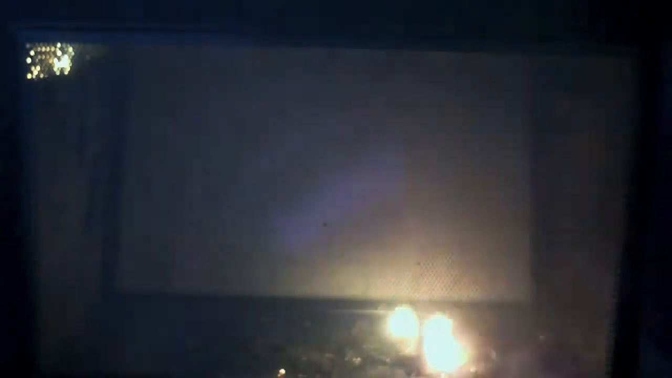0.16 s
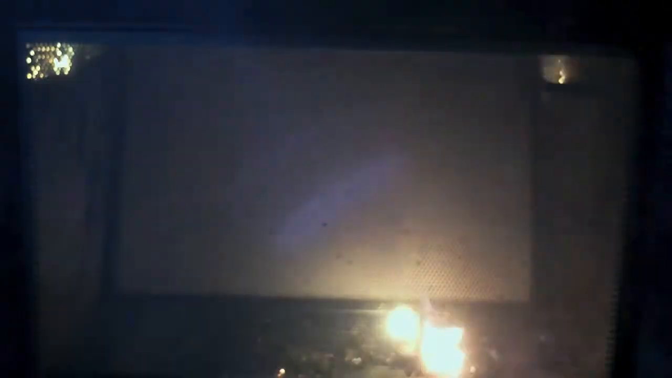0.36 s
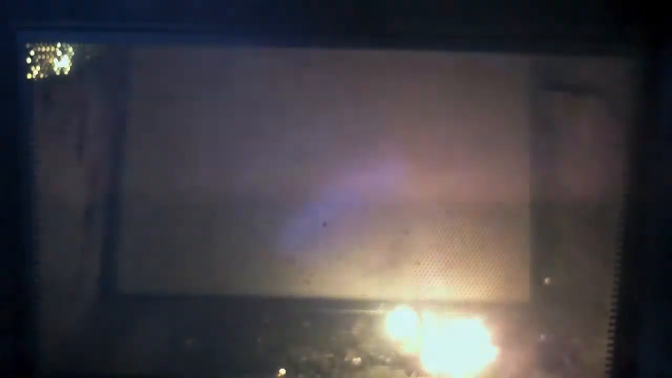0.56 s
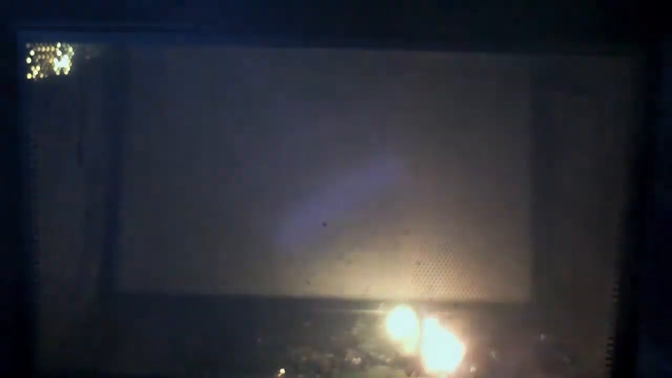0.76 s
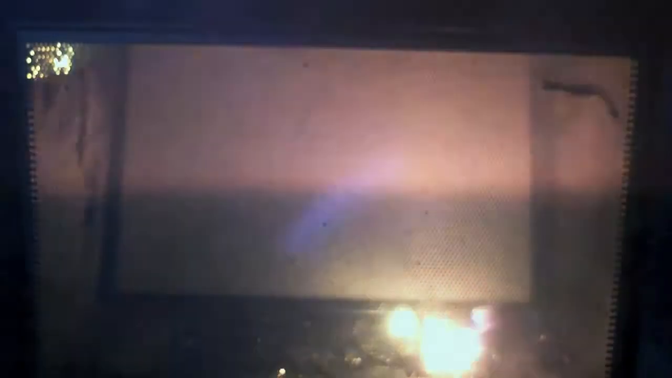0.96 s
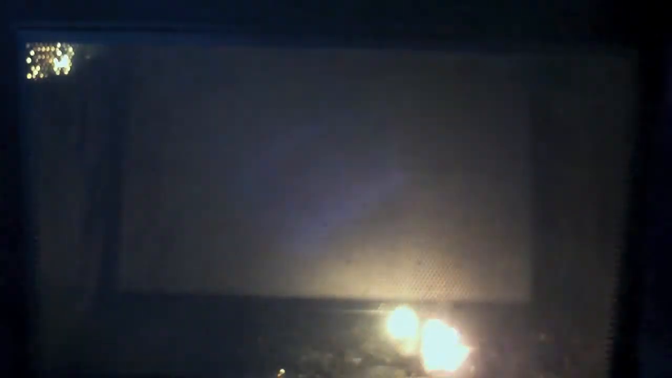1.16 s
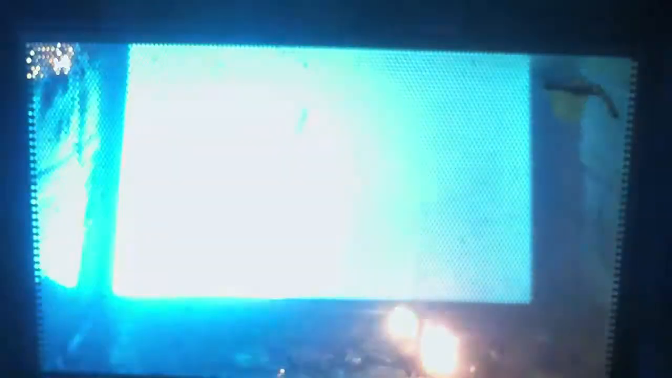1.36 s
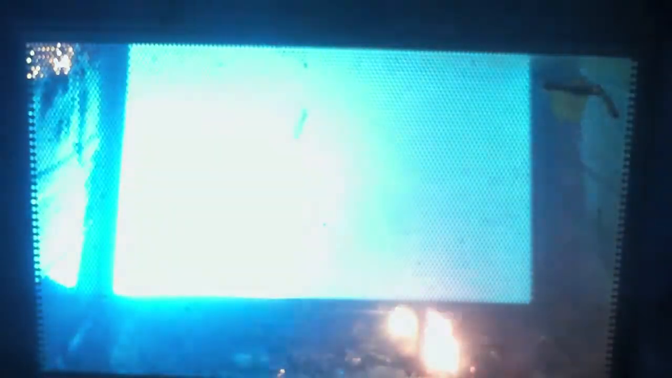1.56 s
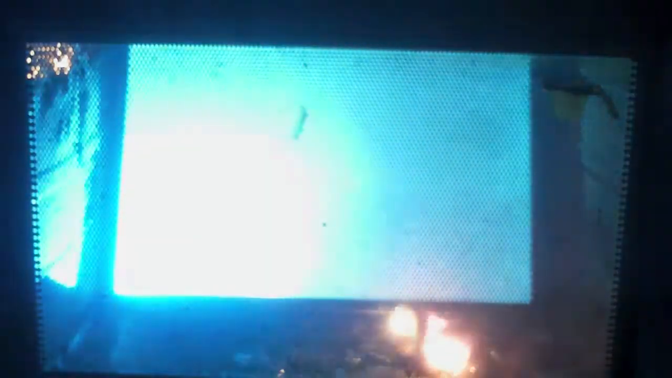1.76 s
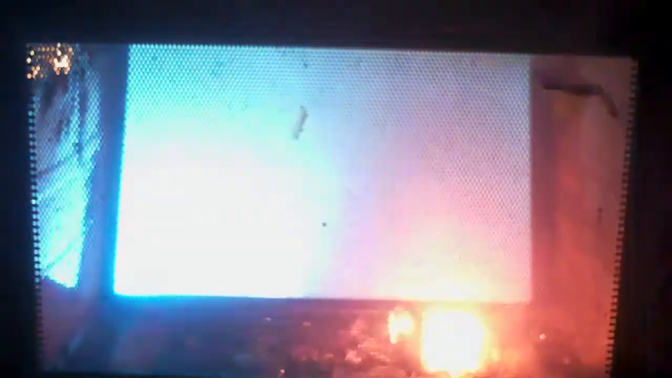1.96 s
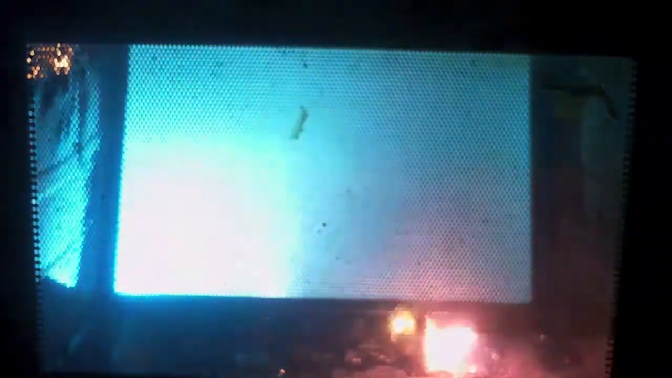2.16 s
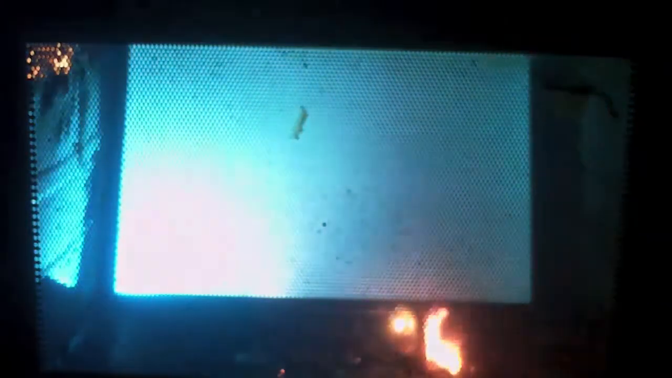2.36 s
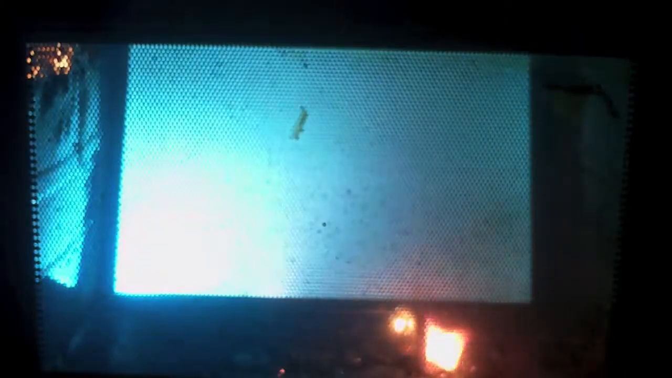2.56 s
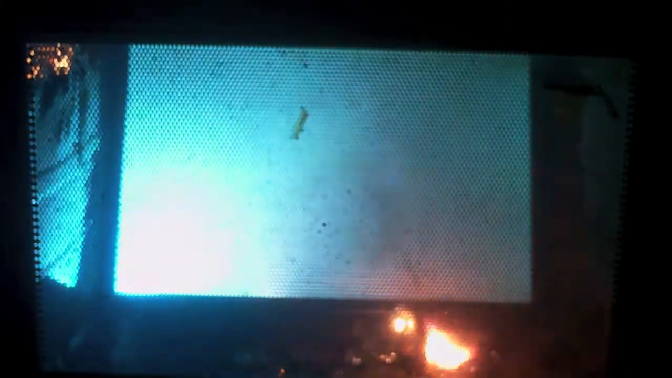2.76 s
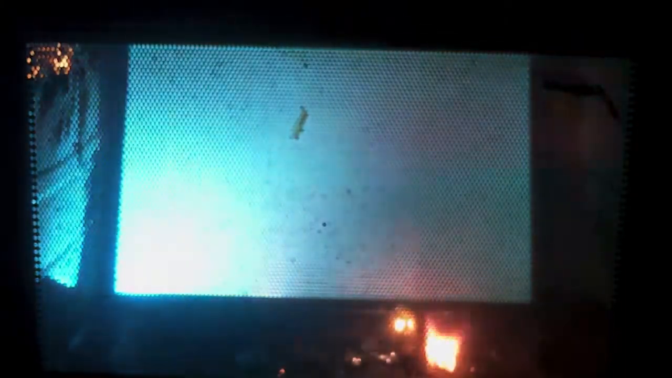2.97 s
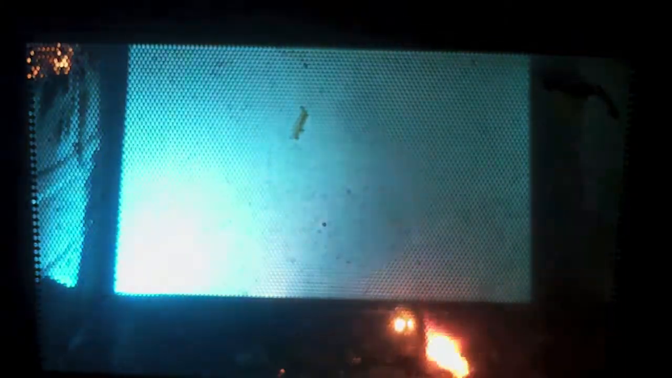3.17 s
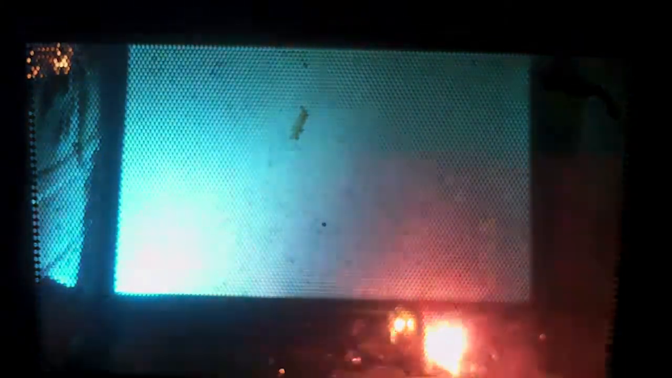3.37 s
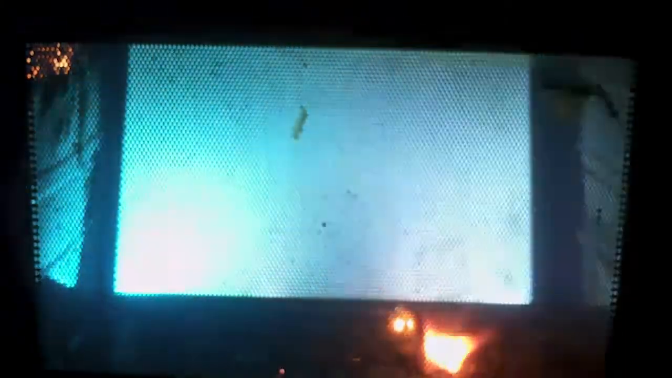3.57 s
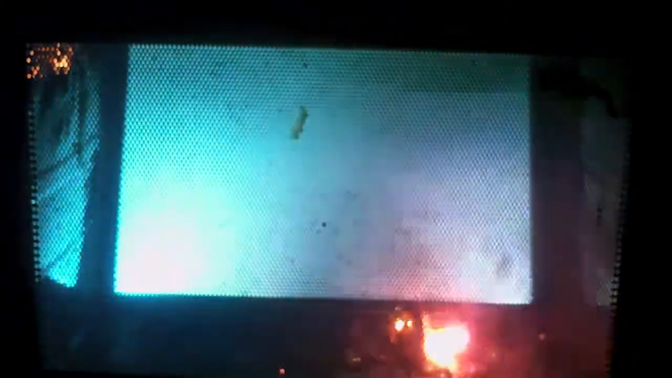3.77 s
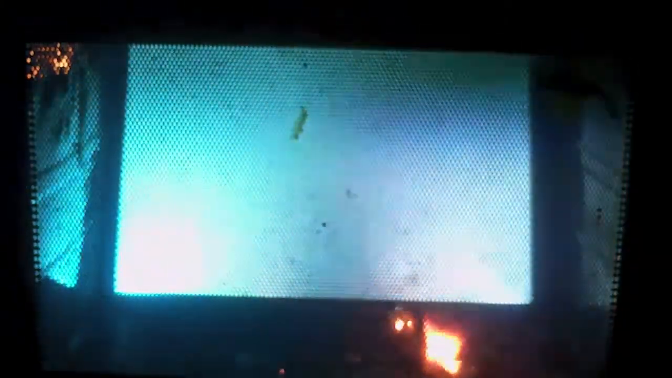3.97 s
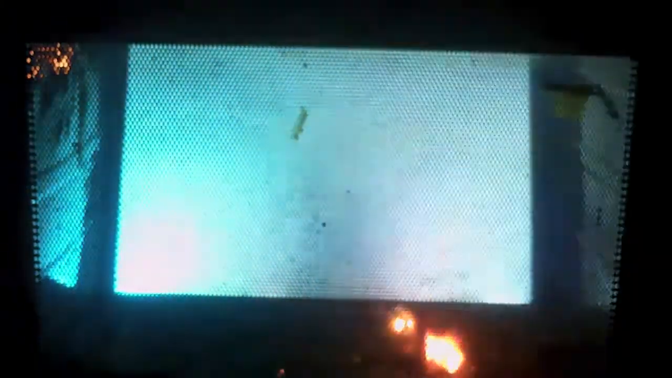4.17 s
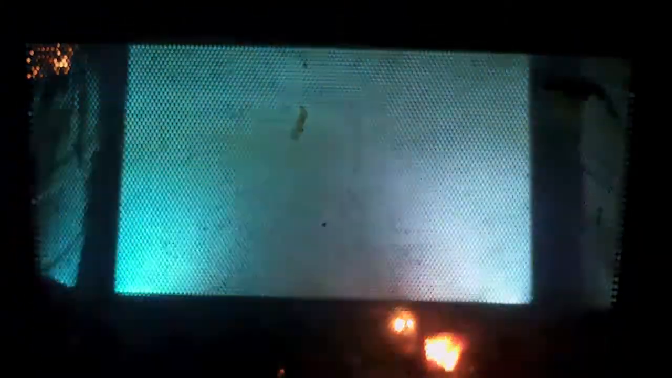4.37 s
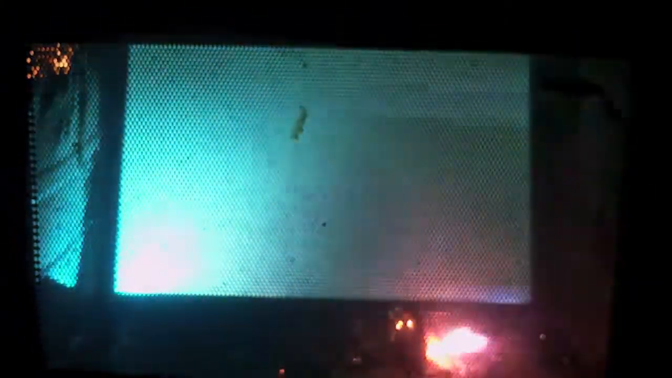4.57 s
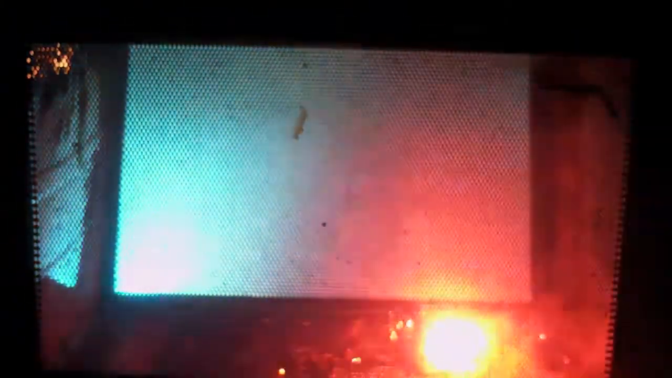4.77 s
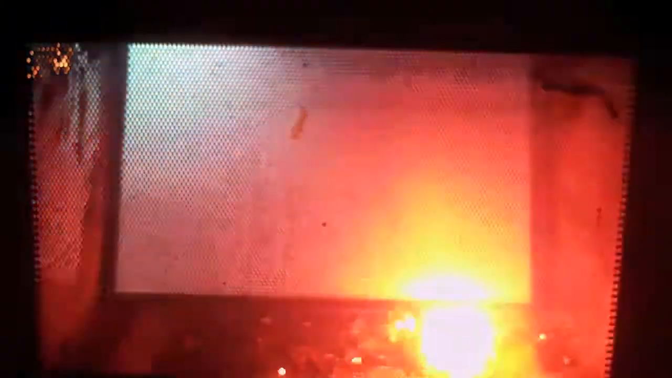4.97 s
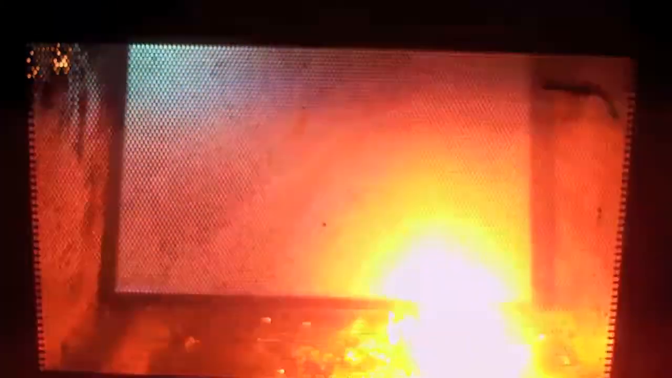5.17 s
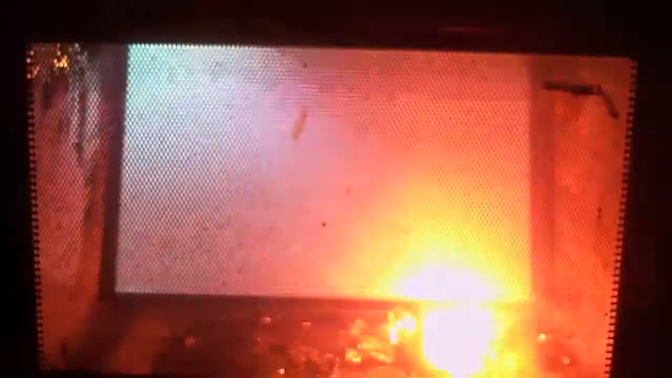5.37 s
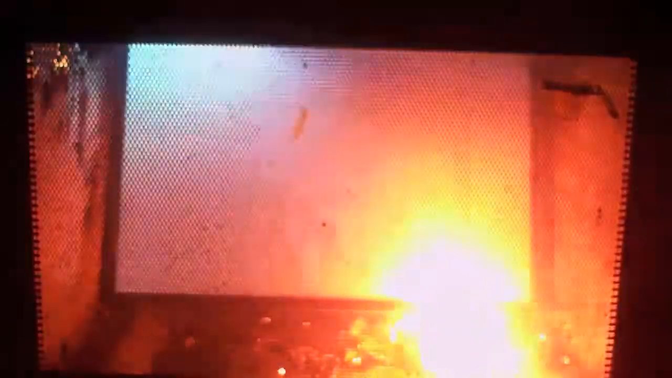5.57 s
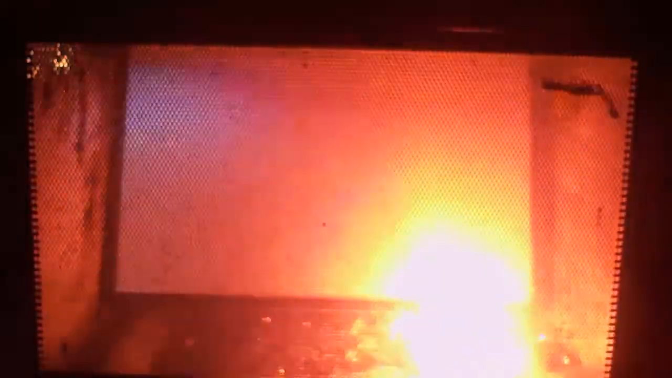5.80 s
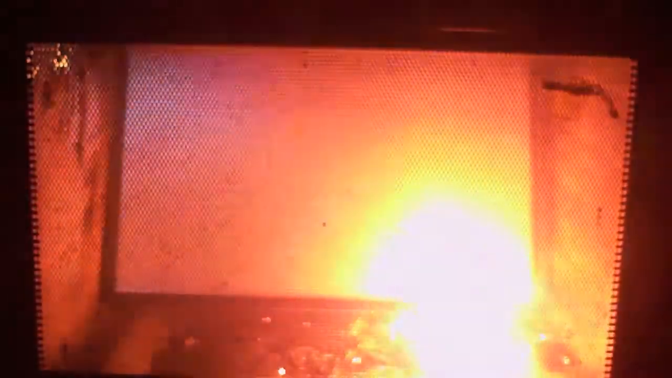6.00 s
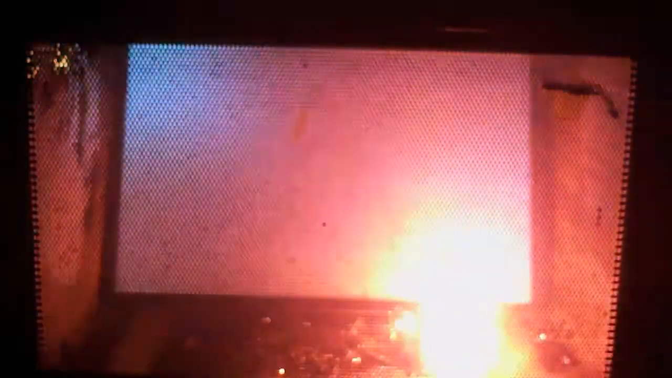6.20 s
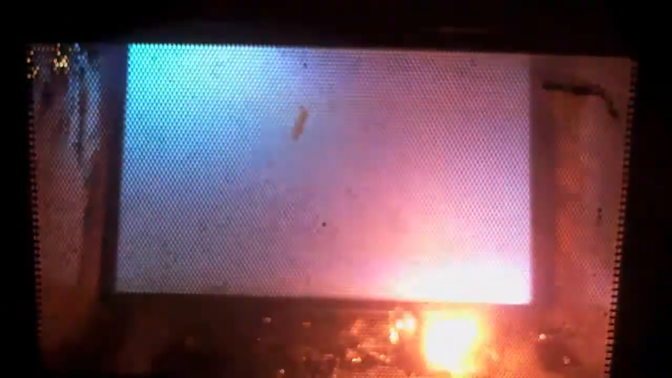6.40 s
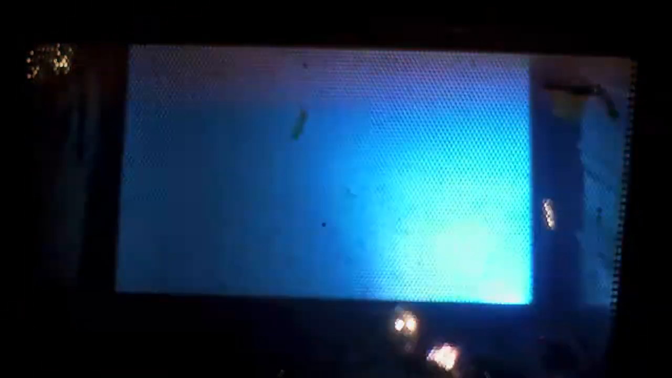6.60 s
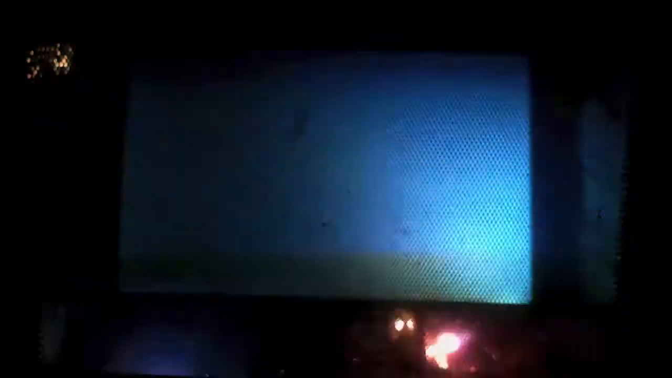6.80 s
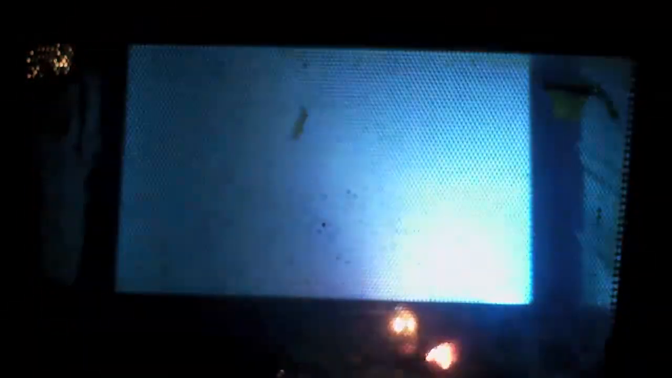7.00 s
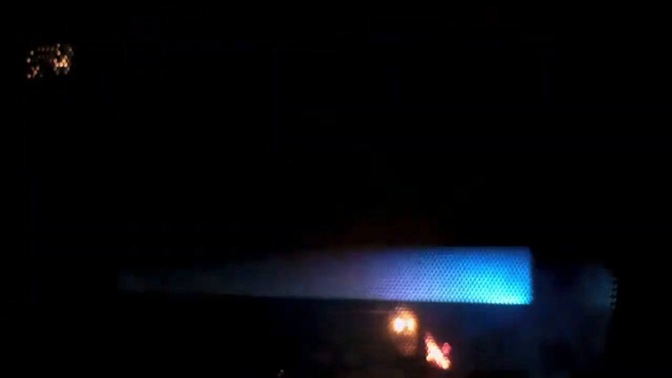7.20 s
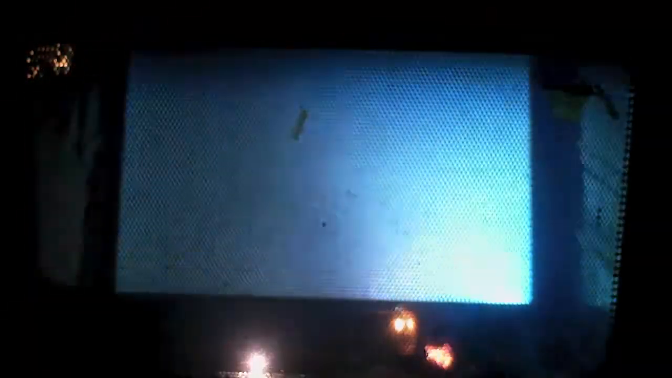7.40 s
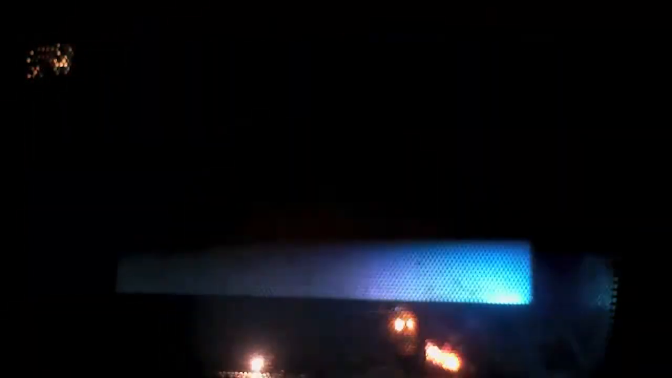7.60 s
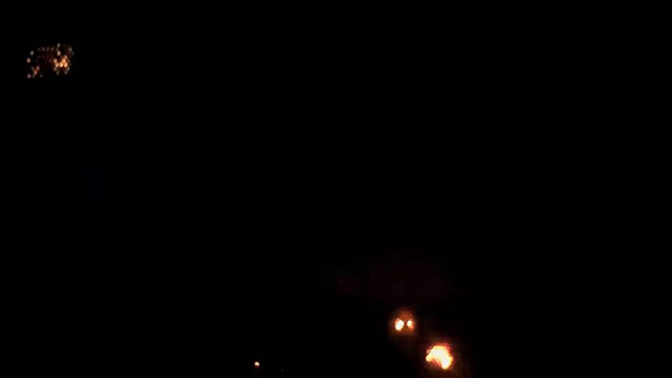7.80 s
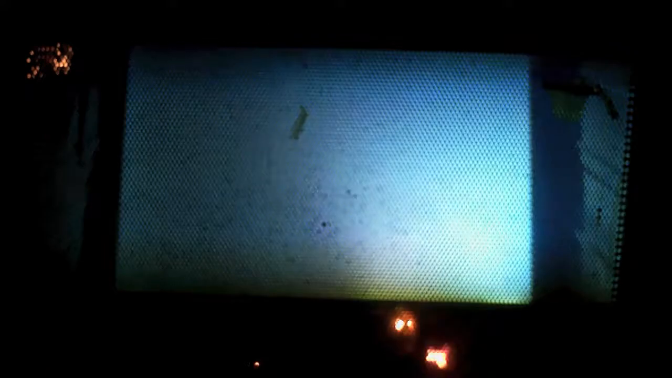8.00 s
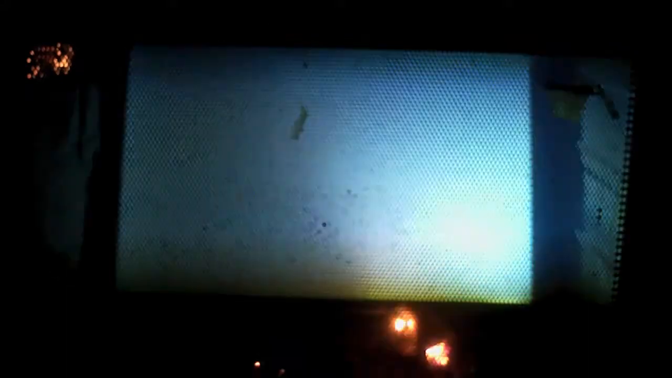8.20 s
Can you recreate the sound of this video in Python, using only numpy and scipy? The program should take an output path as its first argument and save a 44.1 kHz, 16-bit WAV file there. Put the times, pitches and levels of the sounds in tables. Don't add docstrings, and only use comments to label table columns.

```python
import sys
import numpy as np
from scipy import signal
from scipy.fft import rfft, irfft
from scipy.io import wavfile

SR = 44100
rng = np.random.default_rng(int(sys.argv[2]) if len(sys.argv) > 2 else 0)


def gain_from_db(level_db):
    decades = np.asarray(level_db, float) / 20
    return 10 ** decades


def output_pcm(signal):
    pcm = np.clip(np.atleast_2d(signal).T, -1, 1) * 32767
    wavfile.write(sys.argv[1], SR, np.round(pcm).astype(np.int16))


N = 363825

MAINS_HZ = 60.006
ARC_START_S, ARC_END_S = 4.4306, 6.59
# (time [s], level [dB])
EMBERS = [(0.0, -50), (0.44, -53.5), (0.62, -59), (1.47, -62.5), (2.64, -61.5), (2.8, -60), (3.7, -58.5),
          (3.9, -62.5), (4.4, -58.5), (4.7, -59), (5.77, -52.5), (6.43, -63), (6.87, -63), (7.1, -67),
          (7.28, -58), (7.54, -66), (7.88, -58.5), (8.25, -61)]


def unit(x):
    return x / np.sqrt(np.mean(x ** 2) + 1e-20)


def colour(x, points):
    hz, db = np.transpose(points)
    grid = np.maximum(np.fft.rfftfreq(N, 1 / SR), 1)
    gain_db = np.interp(np.log(grid), np.log(hz), db)
    return irfft(rfft(x) * gain_from_db(gain_db), N)


def drift(rate_hz):
    r = np.exp(-2 * np.pi * rate_hz / SR)
    wander = signal.lfilter([1], [1, -2 * r, r * r], rng.standard_normal(N + SR))
    return unit(wander[SR:])


def resonance(x, hz, width_hz):
    r = np.exp(-np.pi * width_hz / SR)
    gain = (1 - r * r) / 2
    return signal.lfilter([gain, 0, -gain], [1, -2 * r * np.cos(2 * np.pi * hz / SR), r * r], x)


def high_pass(x, hz, order=4):
    return signal.sosfilt(signal.butter(order, hz, "high", fs=SR, output="sos"), x)


def ring(clicks, hz, t60):
    r, w = gain_from_db(-60 / (t60 * SR)), 2 * np.pi * hz / SR
    return signal.lfilter([0, np.sin(w)], [1, -2 * r * np.cos(w), r * r], clicks + 1e-18)


def clicks_at(s, db):
    out = np.zeros(N)
    np.add.at(out, np.clip((s * SR).astype(int), 0, N - 1), gain_from_db(db))
    return out


def fading(clicks, t60):
    return signal.lfilter([1], [1, -gain_from_db(-60 / (t60 * SR))], clicks + 1e-18)


def strikes():
    return np.hstack([held_arc(), ember_spits(), lone_sparks()])


def held_arc():
    # (time [s], strength [dB], heat [dB])
    course = [
        (4.45, -29, 0),
        (4.6, -29.5, 0),
        (4.84, -31, 1.5),
        (5.13, -29, -0.5),
        (5.27, -30, 0.5),
        (6.37, -28.5, 0),
        (6.57, -31, 1),
    ]
    # (time [s], crack [dB], ring [dB])
    falters = [(4.447, -6, -1), (4.464, -13, -2), (4.747, -24, -23), (4.864, -6, -3), (5.147, -15, -6),
               (5.997, -0.5, -5), (6.064, -13, -22), (6.081, -0.5, 2.5), (6.297, -8, -14),
               (6.381, -10, 0.5), (6.414, -12, 1.5), (6.431, -16, -8), (6.497, -13, -3), (6.564, -2, -0.5),
               (6.581, 0.5, 4)]
    s = np.arange(ARC_START_S, ARC_END_S, 1 / MAINS_HZ)
    luck = rng.standard_normal((len(s), 5))
    at, *levels = np.transpose(course)
    strength_db, glow_db = [np.interp(s, at, level) for level in levels]
    loss_db = np.zeros((2, len(s)))
    for when, *loss in falters:
        loss_db[:, np.argmin(abs(s - when))] = loss
    crack_db = strength_db + glow_db + loss_db[0] + 1.2 * luck[:, 0]
    fizz_db = crack_db - 16.5 + 0.5 * luck[:, 2]
    ring_db = strength_db + 1.5 + loss_db[1] + 1.0 * luck[:, 3]
    thump_db = -47 + 3.0 * luck[:, 4]
    return np.array([s + 0.00013 * luck[:, 1], crack_db, fizz_db, ring_db, thump_db])


def lone_sparks():
    # (time [s], strength [dB], heat [dB], thump [dB])
    snap_table = [(0.065, -31.5, -3.5, -51), (0.1146, -30, -2, -35), (0.232, -28, -4.5, -38.5),
                  (0.265, -34.5, 7.5, -47), (0.5326, -32.5, -4, -35.5), (0.665, -29, -2.5, -50),
                  (0.934, -31, -14, -57), (1.0001, -31, -5.5, -37.5), (1.2661, -35, 0, -37),
                  (2.1675, -33.5, 2, -42), (2.1818, -26.5, 2, -39), (2.198, -32.5, 7.5, -38),
                  (2.9341, -30.5, 0.5, -36), (3.3148, -28.5, 1.5, -36), (3.3678, -30.5, -2, -35.5),
                  (3.382, -29.5, -1, -43), (3.7154, -31.5, -5, -39), (3.7649, -28.5, -5, -41),
                  (6.6304, -28.5, -3, -37.5), (6.7974, -27, 1.5, -38), (6.8165, -23.5, -8, -32.5),
                  (6.8312, -25, -8, -52), (7.564, -37.5, 14, -55), (7.6473, -27.5, 3, -36.5)]
    # (time [s], strength [dB], heat [dB], thump [dB])
    pop_table = [(0.0495, -54, -3, -44), (0.0964, -45, -4, -60), (0.4503, -34.5, 4.5, -35.5),
                 (0.8857, -37.5, 4, -36), (0.9158, -38, 5, -33.5), (1.235, -32, 3, -38),
                 (1.3838, -33.5, -3, -35), (1.917, -32, -2, -33.5), (1.9482, -29.5, 2.5, -38),
                 (2.216, -40, 0, -60), (2.7627, -43, -4, -39), (2.7807, -43, -10, -40),
                 (6.8803, -42, -3, -53), (7.1334, -33, -6, -33)]
    # (time [s], crack [dB], fizz [dB])
    spit_table = [(0.2456, -40, -75), (0.2982, -56, -71), (0.35, -44, -68), (0.3648, -44, -59),
                  (0.467, -48, -65), (0.515, -51, -55), (1.197, -40, -57.5), (2.097, -46, -48),
                  (3.2827, -41, -56), (3.2982, -49, -55), (3.399, -42, -48), (3.414, -45, -57),
                  (3.431, -38.5, -44), (3.481, -41, -53), (3.53, -52, -50), (3.6817, -53, -56),
                  (3.7, -42, -61), (3.7783, -49, -67), (4.1644, -42, -44.5), (7.1627, -45, -62),
                  (7.181, -47, -59), (7.2679, -55, -42), (7.2805, -44, -61), (7.447, -44, -50),
                  (7.4963, -43, -48), (7.5468, -54, -50), (7.8468, -44, -54), (8.213, -38, -47)]
    # (time [s], fizz [dB])
    tick_table = [(0.547, -55), (0.5643, -56), (1.1807, -62), (1.496, -60.5), (2.7665, -63), (2.9817, -55),
                  (3.2492, -60), (3.2653, -55), (3.563, -66), (3.6641, -59), (3.8143, -41.5), (3.8631, -59),
                  (3.9799, -64), (4.0653, -56), (6.6662, -56), (6.9465, -60), (7.0645, -46), (7.114, -53.5),
                  (7.2146, -58), (7.38, -56), (7.4302, -47), (7.464, -48), (7.5964, -48.5), (7.717, -55),
                  (7.763, -63), (7.7806, -64), (7.7967, -47), (7.8986, -57.5), (8.0306, -66), (8.095, -59)]
    s, db, heat_db, thump_db = np.transpose(snap_table)
    snaps = [s, db - 2.5 + 0.42 * heat_db, db - 20.5 + heat_db, db, thump_db]
    s, db, heat_db, thump_db = np.transpose(pop_table)
    pops = [s, db - 12 + heat_db, db - 31 + heat_db, db, thump_db]
    s, crack_db, fizz_db = np.transpose(spit_table)
    spits = [s, crack_db, fizz_db, crack_db - 4.5, crack_db - 10]
    s, fizz_db = np.transpose(tick_table)
    body_db = fizz_db - 8
    ticks = [s, body_db, fizz_db + 0.5, body_db, body_db]
    return np.hstack([snaps, pops, spits, ticks])


def ember_spits():
    s = np.arange(ARC_START_S % (1 / MAINS_HZ), N / SR, 1 / MAINS_HZ)
    luck = np.minimum(rng.exponential(1, len(s)), 2)
    db = np.interp(s, *np.transpose(EMBERS)) - 5.0 + 2.6 * luck
    return np.array([s, db + 0.5, db - 4.0, db + 0.5, db - 27.0])


def shock_front(s, crack_db):
    return resonance(clicks_at(s, crack_db + 9.5), 3250, width_hz=2100)


def struck(modes, s, db, spread_db, sputter_db, flip):
    out, spread = np.zeros(N), rng.standard_normal((len(s), len(modes)))
    sputter = fading(clicks_at(s, db + sputter_db), t60=0.06) * rng.standard_normal(N)
    t = np.arange(SR // 8) / SR
    surge_s, after_db = 0.0078, -8.5
    surge = gain_from_db(np.interp(t, [surge_s - 0.0015, surge_s + 0.00042], [0, after_db]))
    for k, ((hz, mode_db, t60), luck) in enumerate(zip(modes, spread.T)):
        note = flip ** k * gain_from_db(mode_db - 60 * t / t60) * surge * np.sin(2 * np.pi * hz * t)
        blows = clicks_at(s, db + spread_db * luck) + sputter
        out += signal.oaconvolve(blows, note)[:N]
    return out


def cavity_ring(s, ring_db):
    # (frequency [Hz], level [dB], t60 [s])
    air_modes = [(629, -23.5, 0.2), (819.7, -3, 0.088), (969, -0.5, 0.06), (1113, -18.5, 0.18),
                 (1326, -10, 0.16), (1374, -11, 0.23), (1439, -13, 0.29), (1420, -47, 0.27),
                 (1747, -14.5, 0.2), (1904, -16.5, 0.3)]
    x = struck(air_modes, s, ring_db + 2.0, spread_db=0.9, sputter_db=-35, flip=0.91)
    return signal.sosfiltfilt(signal.butter(2, 430, "high", fs=SR, output="sos"), x)


def mesh_ring(s, crack_db):
    # (frequency [Hz], level [dB], t60 [s])
    mesh_modes = [(2334, -3, 0.049), (2480, -4.5, 0.023), (2677, -7, 0.082), (2892, -6, 0.069),
                  (3138, -5.5, 0.042), (3315, -9, 0.027), (3490, -6.5, 0.057), (3524, -11, 0.067),
                  (3875, 2.5, 0.023), (4290, -12, 0.038), (4467, -8.5, 0.049), (4910, -18, 0.17),
                  (5280, -16, 0.058)]
    x = struck(mesh_modes, s, crack_db - 7.5, spread_db=1.5, sputter_db=-26, flip=-0.97)
    return high_pass(x, 870, order=2)


def fizz(s, fizz_db):
    # (frequency [Hz], density [dB per Hz])
    fizz_colour = [(1180, -20), (2000, -11.5), (2390, -5), (3320, -3.5), (3970, 0), (5220, -10),
                   (6520, -4.5), (7940, -8), (8880, -6), (10100, -6.5), (13900, -14), (14800, -50),
                   (15500, -41)]
    hiss = unit(colour(rng.standard_normal(N), fizz_colour))
    bright = high_pass(hiss, 8000)
    lean_db = 1.12 * rng.standard_normal(len(s))
    out = gain_from_db(16) * resonance(clicks_at(s, fizz_db), 6500, width_hz=7000)
    for band, db in ((hiss - bright, fizz_db - lean_db), (bright, fizz_db + lean_db)):
        clicks = clicks_at(s, db)
        envelope = fading(clicks, t60=0.039) + gain_from_db(-14.5) * fading(clicks, t60=0.1)
        out += gain_from_db(3.5) * band * envelope
    t = np.arange(N) / SR
    flame_db = np.interp(t, *np.transpose(EMBERS)) - 13.0 + 0.9 * drift(2.0)
    return out + hiss * gain_from_db(flame_db)


def thump(s, thump_db):
    in_arc = (s > ARC_START_S - 0.005) & (s < ARC_END_S)
    way = np.where(in_arc, rng.choice([-1, 1], len(s)), 1)
    flex = np.zeros(N)
    np.add.at(flex, (s * SR).astype(int), gain_from_db(thump_db + 3.5) * way)
    casing = ring(flex, 199.5, t60=0.026) + gain_from_db(-0.5) * ring(flex, 230, t60=0.016)
    return high_pass(casing, 118, order=2)


def split():
    return ring(clicks_at(np.array([7.2679]), -28.5), 760, t60=0.03)


def hum():
    # (multiple of mains [1], idle level [dB rms], level while the arc holds [dB rms])
    partials = [(1, -66.5, -58), (2, -51, -50.5), (3, -62.5, -50.5), (4, -47, -57.5), (5, -67.5, -49),
                (6, -61.5, -58), (7, -65, -60.5), (10, -67, -74)]
    t = np.arange(N) / SR
    arcing_times = [ARC_START_S - 0.01, ARC_START_S + 0.028, ARC_END_S - 0.01, ARC_END_S + 0.024]
    arcing = np.interp(t, arcing_times, [0, 1, 1, 0])
    out = 0
    for k, idle_db, arcing_db in partials:
        phase = 2 * np.pi * (k * MAINS_HZ * t + rng.random())
        level = gain_from_db(idle_db) * (1 - arcing) + gain_from_db(arcing_db + 2.2 * drift(3.7)) * arcing
        level = level * gain_from_db(0.6 * drift(12.0))
        out = out + np.sqrt(2) * level * np.sin(phase + 0.07 * drift(10.5))
    return out


def fan():
    # (frequency [Hz], density [dB per Hz])
    air_colour = [(12, -45), (20, -20), (70, -14), (118, -10.5), (183, -4.5), (242, -6), (310, -15),
                  (357, -14), (555, -12.5), (1210, -9), (2100, -31.5), (2930, -24.5), (5240, -45),
                  (12000, -65), (15000, -83)]
    # (frequency [Hz], width [Hz], level [dB rms])
    rotor_tones = [
        (28, 5.6, -63.5),
        (1195, 11.4, -64),
        (1308, 9.4, -63.5),
    ]
    air = gain_from_db(-49.5 + 0.81 * drift(9.7)) * unit(colour(rng.standard_normal(N), air_colour))
    white = rng.standard_normal(N)
    for hz, width_hz, db in rotor_tones:
        tone = resonance(resonance(white, hz, width_hz), hz, width_hz)
        air = air + gain_from_db(db) * unit(tone)
    return air


def scene():
    s, crack_db, fizz_db, ring_db, thump_db = strikes()
    box = cavity_ring(s, ring_db) + mesh_ring(s, crack_db)
    sparks = shock_front(s, crack_db) + box + fizz(s, fizz_db) + thump(s, thump_db)
    return (sparks + split() + hum() + fan())[None]


def top_cut(x):
    return signal.sosfilt(signal.butter(12, 15640, fs=SR, output="sos"), x)


def record(dry):
    notch_hz = 7900
    x = dry - resonance(dry, notch_hz, width_hz=280)
    x = x - resonance(x, notch_hz, width_hz=240)
    x = signal.sosfilt(signal.cheby2(12, 60, 15700, fs=SR, output="sos"), x)
    return top_cut(x)


dry = scene()
out = record(dry)
output_pcm(out)
```